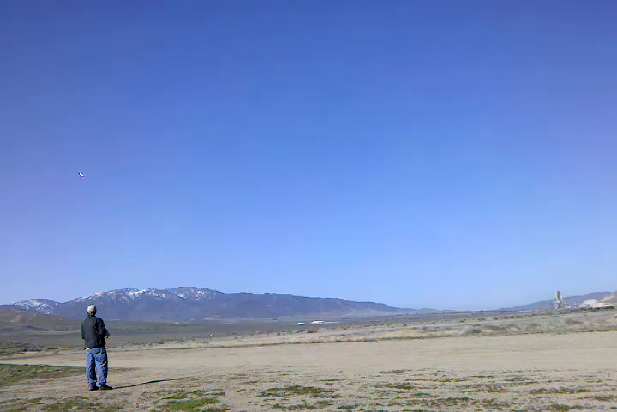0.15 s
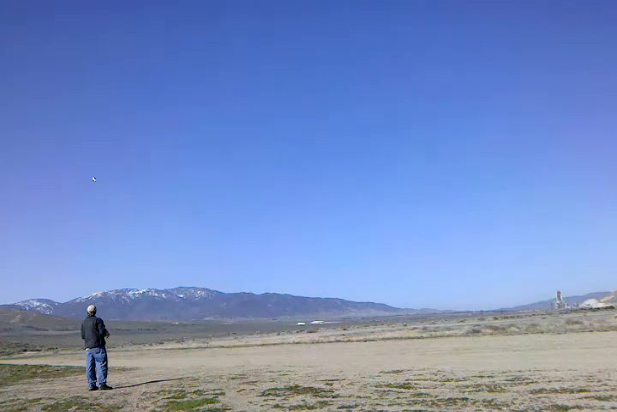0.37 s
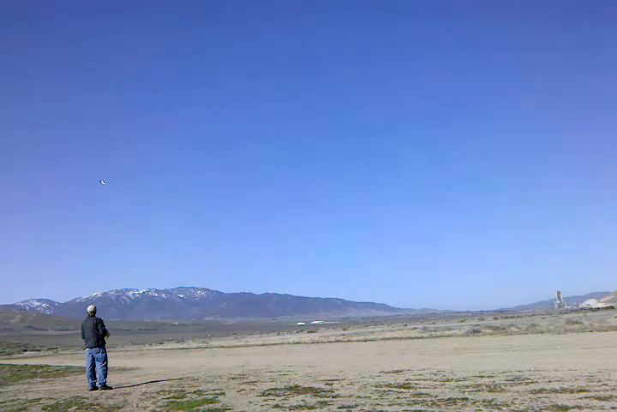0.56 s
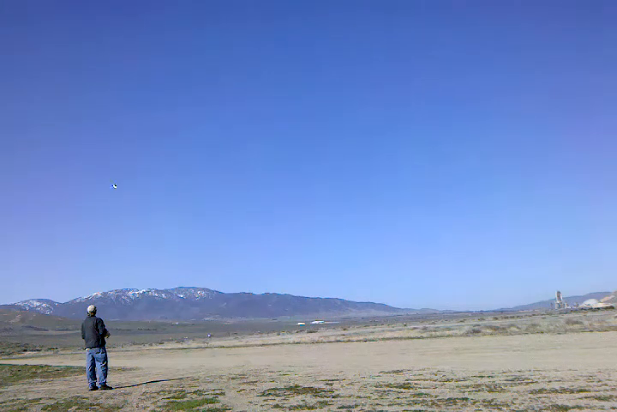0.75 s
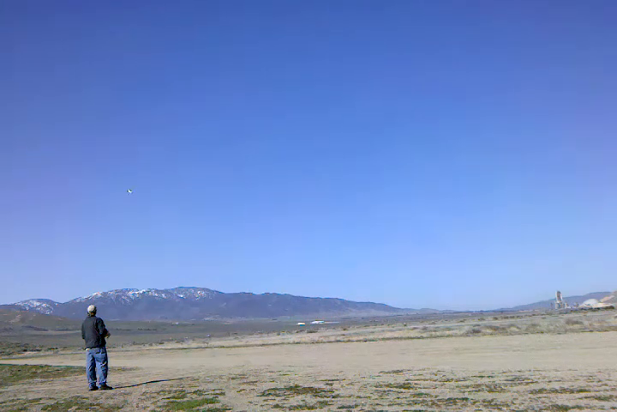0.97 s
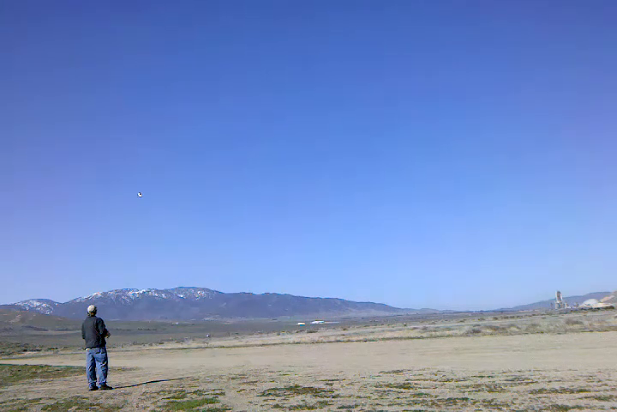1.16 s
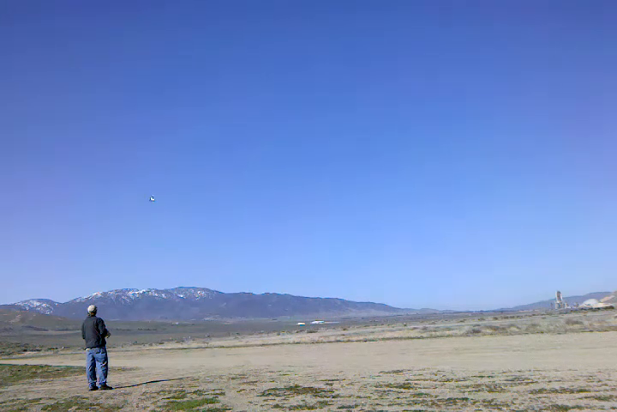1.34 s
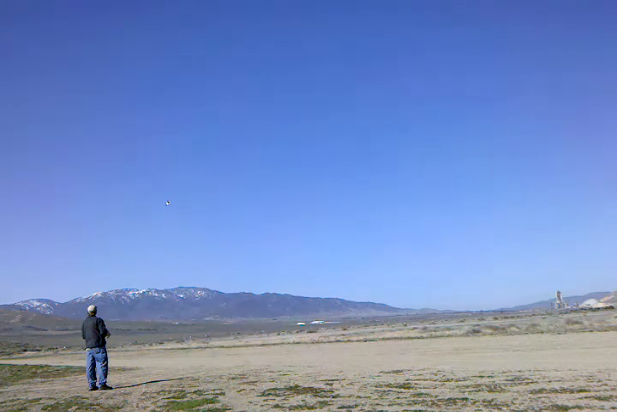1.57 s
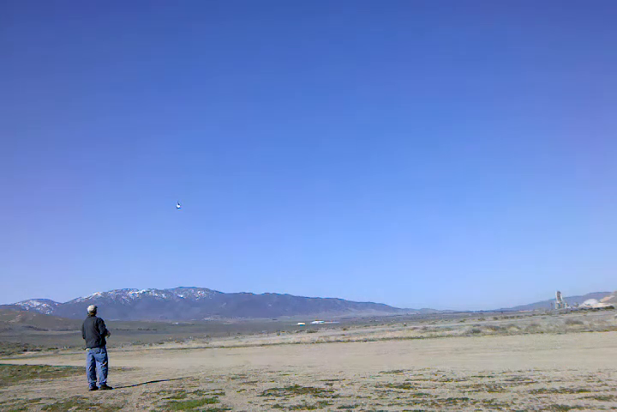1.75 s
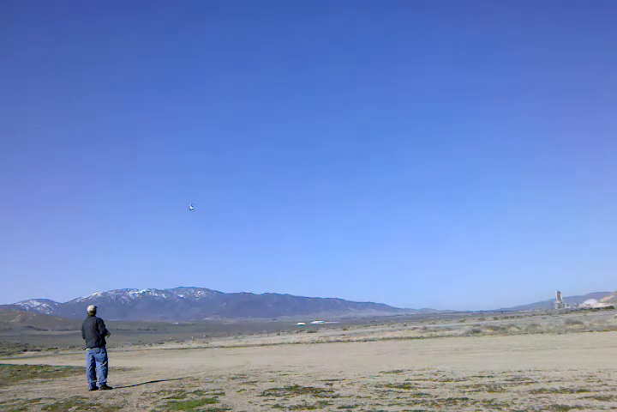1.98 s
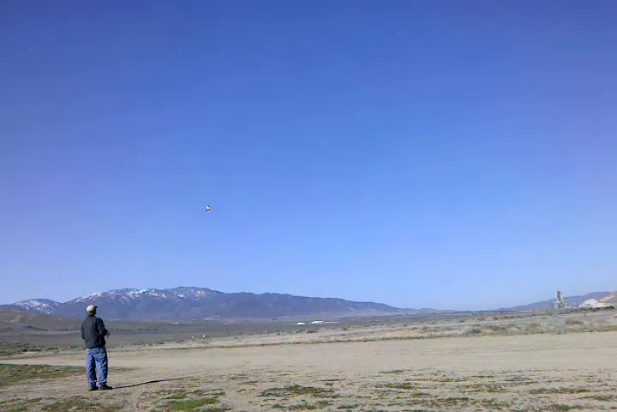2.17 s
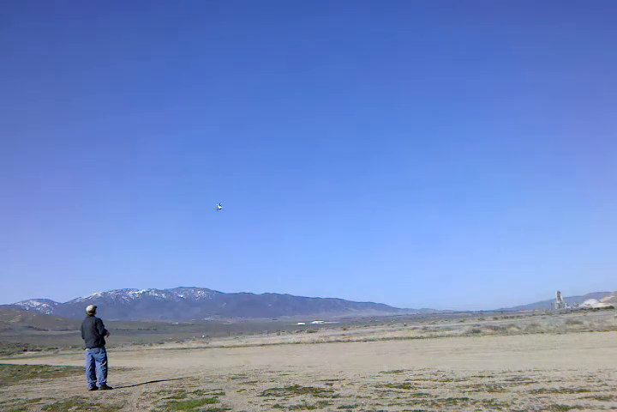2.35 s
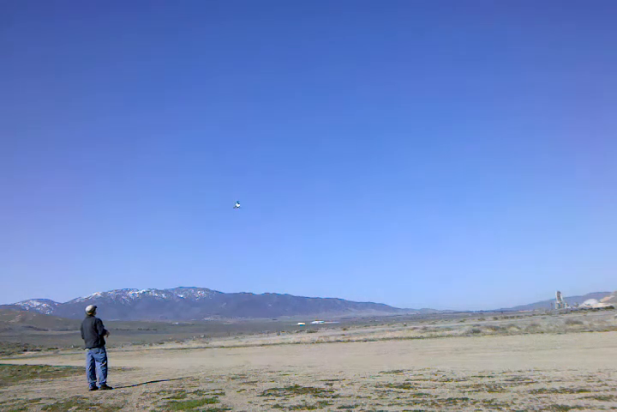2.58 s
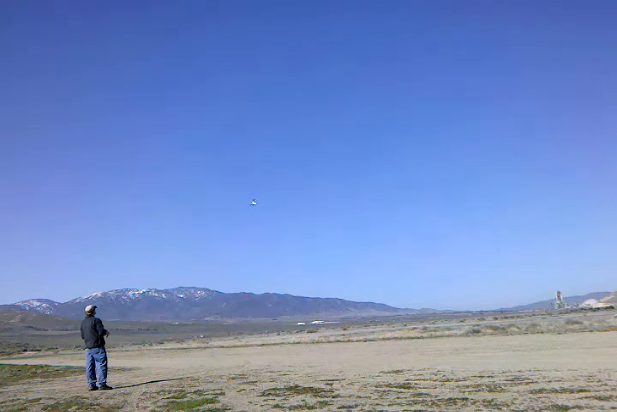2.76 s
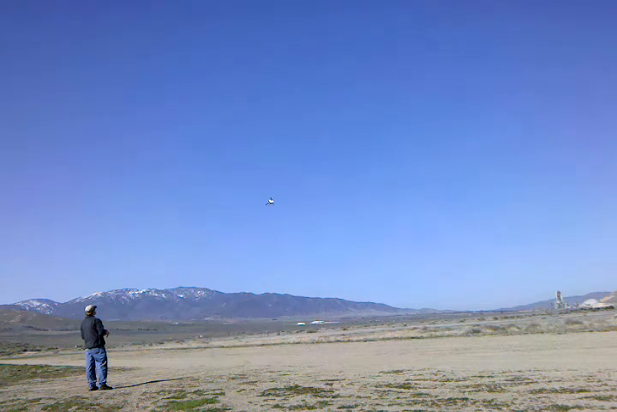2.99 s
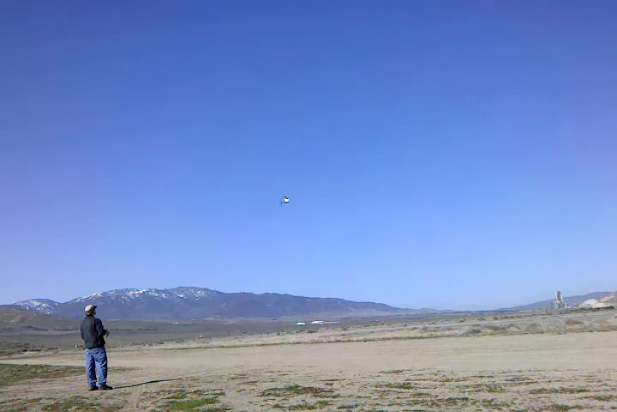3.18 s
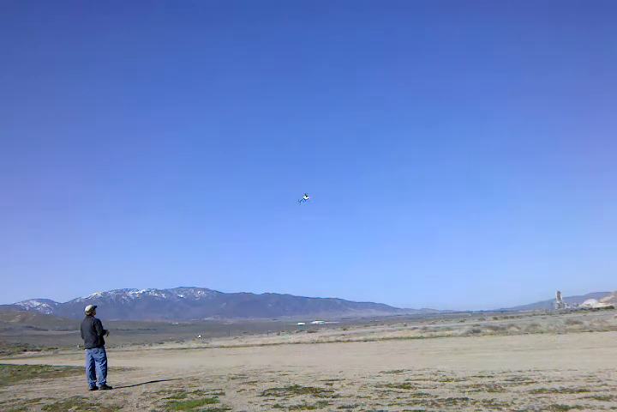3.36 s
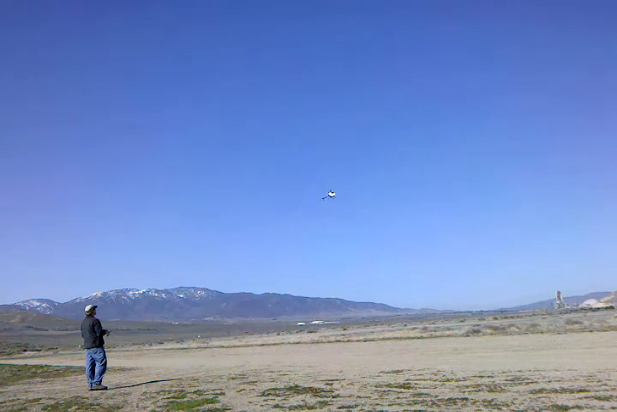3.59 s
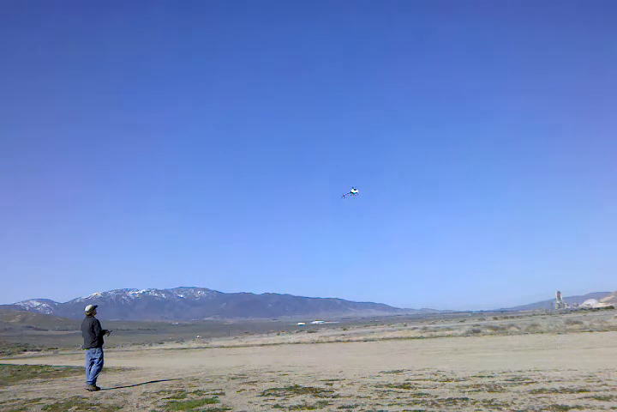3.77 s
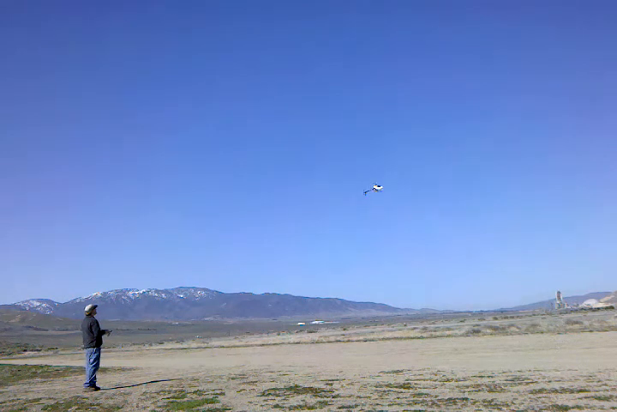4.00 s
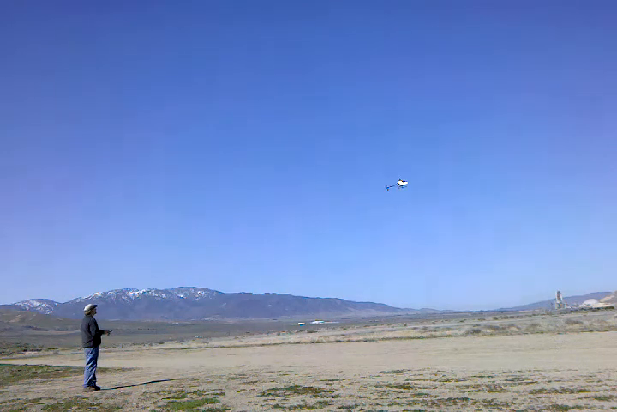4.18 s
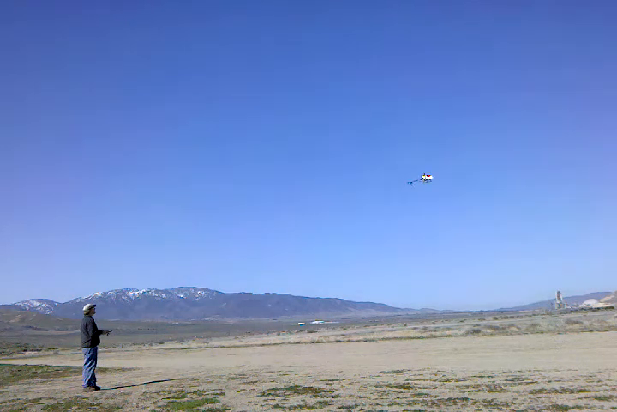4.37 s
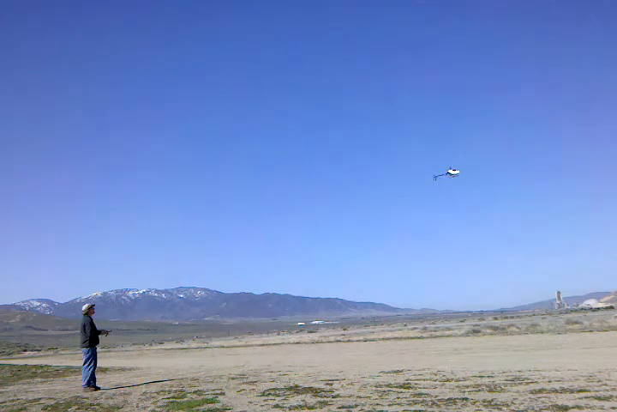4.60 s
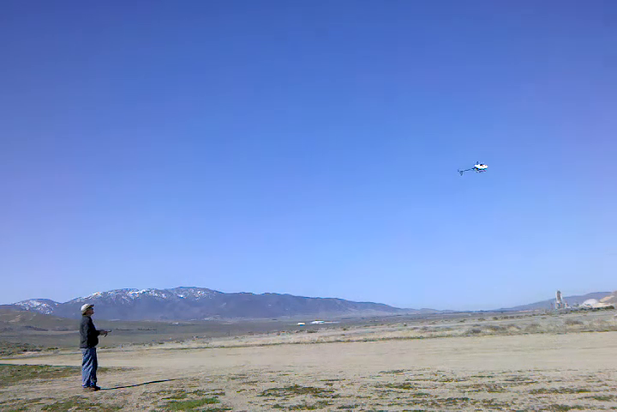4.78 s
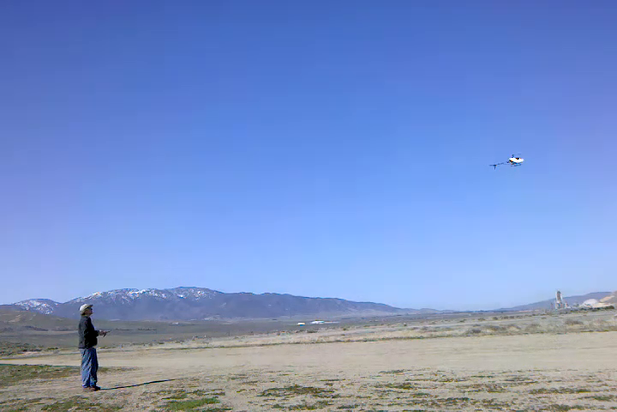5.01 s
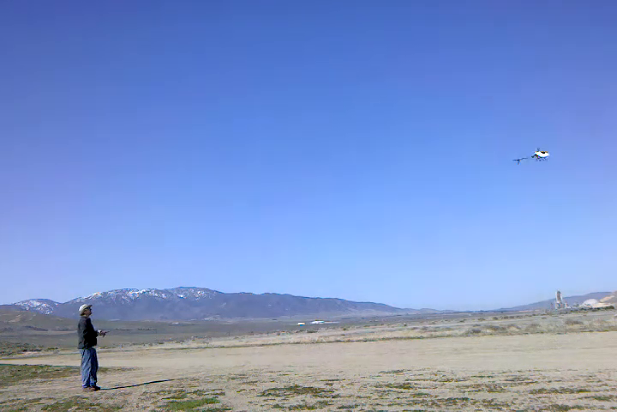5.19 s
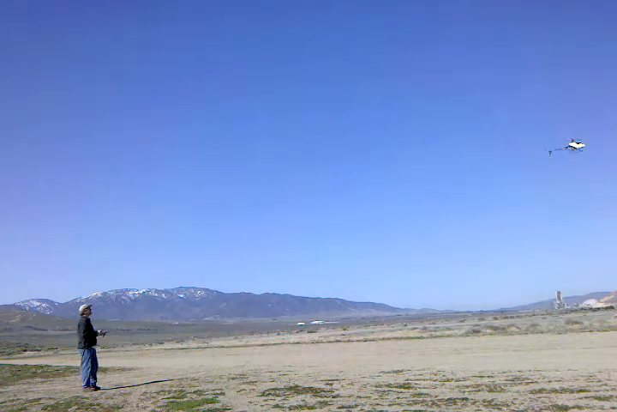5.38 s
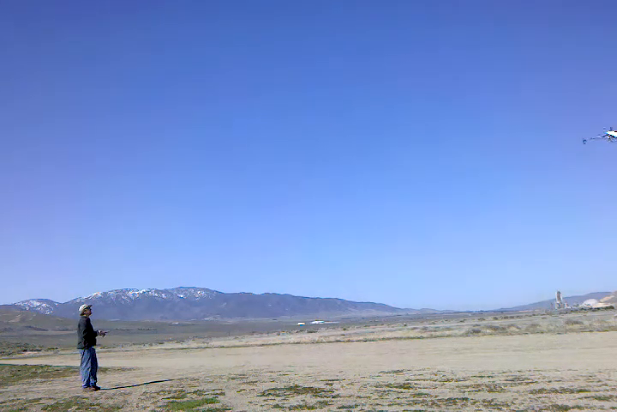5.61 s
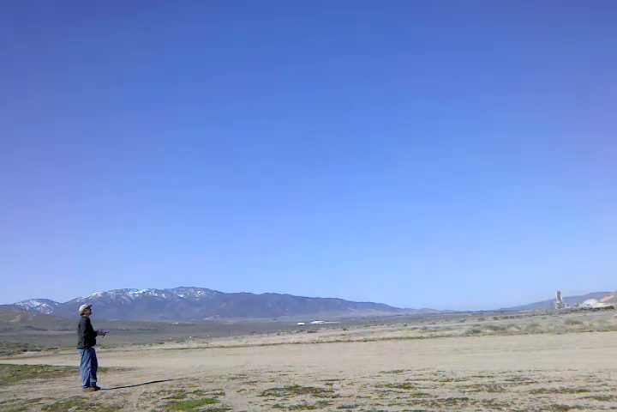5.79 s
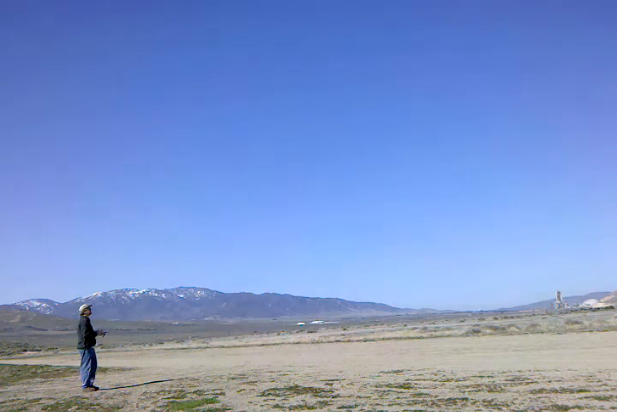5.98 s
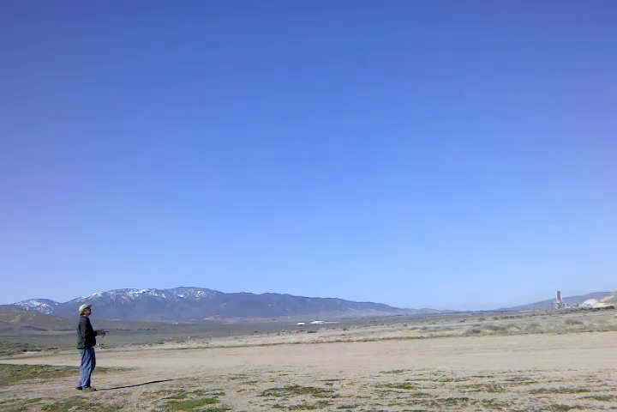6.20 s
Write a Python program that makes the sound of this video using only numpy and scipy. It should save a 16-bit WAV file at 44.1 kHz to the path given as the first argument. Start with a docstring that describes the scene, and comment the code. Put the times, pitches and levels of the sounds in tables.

```python
"""A distant swish and buzz over a dry field: a small electric model helicopter turns and comes close.
One rotor speed drives it all: two main blades that swish, thump and slap their own wake in the turn,
a buzzing tail rotor, a whining motor and a main gear whose mesh tone throbs once a revolution.
Swish and tones follow the distance and the side the helicopter shows; the slaps come in spells.
A narrow-band microphone trims the deep bass and the top."""
import sys
import numpy as np
from scipy import signal
from scipy.fft import rfft, irfft, next_fast_len
from scipy.io import wavfile
from scipy.ndimage import map_coordinates

SR = 44100
rng = np.random.default_rng(int(sys.argv[2]) if len(sys.argv) > 2 else 0)


def unload_wav(signal):
    """Save mono or channel-first audio to the path in sys.argv[1] as 16-bit WAV at rate SR, clipped to [-1, 1]."""
    wavfile.write(
        sys.argv[1],
        SR,
        np.round(np.clip(np.atleast_2d(signal).T, -1, 1) * 32767).astype(np.int16),
    )


N = 275625
TIME = np.arange(N) / SR

# main rotor speed as heard, Doppler shift included: (time [s], speed [turns/s])
ROTOR_SPEED = [(0.0, 27.2), (0.25, 27.35), (0.75, 28.04), (1.25, 28.84), (1.7, 29.3), (2.1, 29.38),
               (3.1, 29.09), (3.9, 28.88), (4.4, 28.47), (5.05, 28.24), (5.8, 27.84), (6.25, 27.53)]
# one long turn and a pass; aspect -180 is tail on, 0 nose on, 90 abeam:
# (time [s], distance [m], aspect [deg], ground echo lag [ms], lag across the rotor [ms])
FLIGHT_PATH = [(0, 43, -160, 1.6, 0.8), (.5, 44, -140, 1.574, 0.77), (1.2, 45.4, -110, 1.434, 0.707),
               (2, 42.4, -69, 1.392, .67), (2.6, 41.4, -46, 1.328, 0.37), (3.249, 33, -16.5, 1.373, 0.39),
               (3.601, 29.6, -5.5, 1.082, 0.39), (4.1, 23.7, 13, 1.084, 0.412),
               (4.6, 19.5, 34.5, 1.09, 0.471), (5.3, 15.5, 58.5, 1.094, 0.487),
               (5.7, 13.2, 72, 1.145, .527), (5.999, 11.1, 86.5, 1.175, .535),
               (6.25, 9.9, 100.5, 1.21, .54)]
# blend of the swish colours: (aspect [deg], view [0 far, 1 nose on, 2 abeam])
VIEWS = [(-75.5, 0.19), (-11, 0.87), (11.5, 1), (30, 1.46), (78, 2)]
# colour of the swish from each view, and of a blade crack: (frequency [Hz], relative level [dB])
AIR_FAR_EQ = [(60, -27), (110, -6.5), (360, -16), (650, 1.5), (900, -4.5), (1400, -10.5), (2150, -0.5),
              (2600, -6.5), (3200, -3.5), (3900, -14.5), (5000, -6.5), (5450, -11), (6000, -6), (7000, -14)]
AIR_FRONT_EQ = [(60, -29), (110, -11.5), (380, -16.5), (680, 5.5), (860, -3), (1150, -2.5), (1450, -14.5),
                (1750, -7), (2400, -1.5), (2900, -4), (4100, -6.5), (5300, -9.5), (6100, -13.5),
                (7000, -15)]
AIR_ABEAM_EQ = [(60, -31), (130, -16), (340, -11.5), (480, 1), (720, 5.5), (870, -7.5), (1200, 3),
                (1700, -0.5), (2050, 0.5), (2600, -2.5), (3200, -4.5), (4400, -4), (6000, -3),
                (7000, -13.5)]
CRACK_EQ = [(100, -25), (400, -20.5), (700, 4.5), (1150, 2), (1430, -4), (1700, 5.5), (2050, -7),
            (2550, -1.5), (2950, -16.5), (3400, -7), (4300, -18.5), (5500, -33), (7000, -20.5)]
# the knock of each main blade: (relative level [dB], pitch [Hz], time to fall 60 dB [s])
BLADE_KNOCKS = [(-1, 678, 0.037), (0, 726, .02)]
# where each blade meets the wake, tracking slightly unevenly: (position [turns])
SLAP_POSITIONS = [.94, .462]
# the blades run into their wake: (start [s], length [s], base knock level [dB], crack level [dB])
WAKE_SPELLS = [(0, 0.017, -55.5, -59), (.75, 0.18, -60.5, -63), (1.99, .17, -58.5, -61),
               (2.2, 0.094, -44.5, -51), (2.3, .45, -47.5, -50), (2.768, .11, -51, -50.5),
               (3.202, 0.2, -50.5, -49), (3.504, 0.28, -52, -47.5), (3.744, 0.39, -54.5, -50),
               (5.814, 0.13, -51.5, -64)]
# single harder wake strikes: (time [s], relative level [dB])
HARD_STRIKES = [(0.779, -63), (0.8317, -54), (0.8826, -62.5), (0.918, -56), (2.246, -51), (2.602, -47.5),
                (3.03, -50), (3.567, -52), (4, -42.5), (5.7, -58.5), (5.989, -46)]

# A beam is how a sound leaves the helicopter: (base level at REFERENCE_M [dB], lift ahead and
# cut behind [dB], lobes), with each lobe or notch as (aspect [deg], width [deg], gain [dB]).
SWISH_BEAM = (-45.5, 0.82, [(-16.5, 35, 4)])
HISS_BEAM = (-42, 0.57, [(41, 19, -2.5), (-58.5, 12, -0.5)])
THUMP_BEAMS = [(-64.5, 2.5, [(-12, 11, 3), (37.5, 27, -12.5), (79.5, 27, 7)]),
               (-68.5, 0, [(-16.5, 36, 12.3), (73, 11, 5.8)])]  # second and third harmonic of the main blades
TAIL_BLADE_BEAMS = [(-57, 2.1, [(-84.5, 55, 5), (58, 34, -5), (97, 16, -21.5)]),
                    (-55, 11.1, [(-34.5, 38.6, -28.5), (-2.5, 9, -4.5), (101.5, 14, -6.5)]),
                    (-57, 1.6, [(-55, 8.5, 5.7), (14, 9, 6), (100, 7.7, 7)]), (-65.5, 4, [(-135, 28, 16)]),
                    (-60, 0.76, [(-90.5, 44, -8.5), (29.5, 8.5, 3)])]  # one per harmonic, lowest first
TAIL_GEAR_BEAMS = [(-59.5, 4, [(65.7, 13, -10.5), (93.5, 18, 6)]), (-56, 0, [(-90, 55, 7.5),
                   (-29, 15, -12.5), (75, 25, -15)]), (-67, 3, [(-60.5, 50, -13.5)])]  # one per harmonic, lowest first
MOTOR_BEAMS = [(-53.5, 0, [(-160, 24, -11.5), (-0.5, 5.6, -16)]), (-66, 6, [(-120, 50, 9)]),
               (-49.5, 4.5, [(-150, 32, -7.5), (-88, 21, 3.5), (50, 45.6, -9.5)]),
               (-64.5, 0, [(-32.5, 31, -9.5), (57, 10, 9.5)]), (-70.5, 8, [(-90.5, 23, 8.2), (3.5, 12, 7)]),
               (-72, -1, [(-110, 15, 8), (63.5, 16, 17)])]  # one per entry of MOTOR_ORDERS
OVERTONE_BEAM = (-70, -1.3, [(-115, 40, 3)])
MAIN_GEAR_BEAM = (-57, 0, [(-118, 9.2, -8.5), (-29.5, 8.6, -7.5), (-14, 8, 3), (9.5, 8, -3.5),
                  (77.5, 56, 14)])

# weak tones of unequal blades, and faint drive train overtones: (pitch [multiples of rotor speed])
IMBALANCE_ORDERS = [11, 13, 15]
OVERTONE_ORDERS = [112.5, 117, 126, 153, 180, 194, 206]
# partials of the motor: (pitch [multiples of motor speed])
MOTOR_ORDERS = [1, 2, 4, 6, 8, 12]
HISS_COMB_DEPTHS = [.2, .7, .26]  # far, nose on, abeam

MOTOR_RATIO, PINION_TEETH = 17, 10  # ratios are shaft turns per main rotor turn
TAIL_RATIO, TAIL_TEETH = 4.5, 9
REFERENCE_M, HISS_ABSORB_DB_PER_M = 10, 0.34
SPELL_RISE_DB_PER_S, SPELL_FALL_DB_PER_S, CALM_SLAP_DB = 88, 49.5, -74.5
WAKE_SWISH = 0.49  # share of the base knock level that feeds the swish
THROB_DB, THROB_DIP_DB, THROB_DIP_AT_DEG, THROB_DIP_WIDTH_DEG = 7.5, 6.3, -6.5, 26
TOP_HZ = 9000


def amp(db):
    """Decibels to gain."""
    return 10 ** (np.asarray(db) / 20)


def unit(x):
    """Scale to rms 1."""
    return x / np.sqrt(np.mean(x ** 2) + 1e-20)


def curves(rows):
    """An automation curve for each column after the time."""
    times, *columns = np.transpose(rows)
    return [np.interp(TIME, times, column) for column in columns]


def wobble(rate):
    """A smooth random curve, rate knots a second."""
    coarse = TIME[::16]
    knots = rng.standard_normal(int(N * rate / SR) + 4)
    return np.interp(TIME, coarse, map_coordinates(knots, [coarse * rate]))


def filtered(x, response):
    """x through a gain that depends on frequency."""
    size = next_fast_len(N + SR // 4)
    return irfft(rfft(x, size) * response(np.fft.rfftfreq(size, 1 / SR)), size)[:N]


def coloured(x, eq):
    """x through an EQ curve of (frequency [Hz], level [dB]) points, at rms 1."""
    freqs, db = np.transpose(eq)
    return unit(filtered(x, lambda hz: amp(np.interp(np.log(hz + 1), np.log(freqs), db))))


def noise():
    """Fresh white noise."""
    return rng.standard_normal(N)


def tone(cycles, level_db, rough):
    """A partial whose strength and phase flutter in the turbulent air."""
    flutter = 1 + rough * (wobble(45) + 1j * wobble(45))
    return amp(level_db) * unit(np.real(flutter * np.exp(2j * np.pi * cycles)))


def swell(cycles, peak_at, depth_db):
    """A tremolo gain of rms 1 that peaks once a cycle."""
    return unit(amp(depth_db * np.cos(2 * np.pi * (cycles - peak_at))))


def delayed(x, lag_ms):
    """x through a sliding delay."""
    return np.interp(TIME - lag_ms / 1000, TIME, x)


def over_ground(x, strength):
    """Porous soil returns a grazing echo upside down, carving a sliding comb into the treble."""
    _, _, ground_ms, _ = curves(FLIGHT_PATH)
    echo = filtered(delayed(x, ground_ms), lambda hz: 1 - 1 / (1 + (hz / 950) ** 6))
    return x - strength * echo


def heard_db(beam, absorb_db_per_m=0):
    """Level at the listener: the beam's pattern, less spreading and any absorption in the air."""
    base_db, ahead_db, lobes = beam
    metres, aspect, _, _ = curves(FLIGHT_PATH)
    facing_db = ahead_db * np.cos(np.radians(aspect))
    lobes_db = sum(gain * np.exp(-((aspect - at) / width) ** 2) for at, width, gain in lobes)
    loss_db = 20 * np.log10(metres / REFERENCE_M) + absorb_db_per_m * (metres - REFERENCE_M)
    return base_db + facing_db + lobes_db - loss_db


def wake_levels():
    """Knock and crack envelopes in dB: each spell rises quickly, holds and dies away."""
    knock_db = crack_db = CALM_SLAP_DB
    for start, length, knock, crack in WAKE_SPELLS:
        attack_db = SPELL_RISE_DB_PER_S * np.maximum(start - TIME, 0)
        release_db = SPELL_FALL_DB_PER_S * np.maximum(TIME - start - length, 0)
        knock_db = np.maximum(knock_db, knock - attack_db - release_db)
        crack_db = np.maximum(crack_db, crack - attack_db - release_db)
    return knock_db, crack_db


def blade_swish(turns):
    """Turbulence on the blades pulses with each pass and changes colour as the helicopter turns."""
    _, aspect, _, across_ms = curves(FLIGHT_PATH)
    view = np.interp(aspect, *np.transpose(VIEWS))
    air = np.zeros(N)
    for k, eq in enumerate((AIR_FAR_EQ, AIR_FRONT_EQ, AIR_ABEAM_EQ)):
        share = np.clip(1 - abs(view - k), 0, 1)
        air += np.sqrt(share) * coloured(noise(), eq)
    air = over_ground(air, strength=.44 - 0.075 * view)
    low = filtered(air, lambda hz: 1 / (1 + (hz / 2000) ** 6))
    high = air - low
    # opposite pressures from spots on the rotor interfere: a broad comb sweeps down in the pass
    high = high - np.interp(view, [0, 1, 2], HISS_COMB_DEPTHS) * delayed(high, across_ms)
    knock_db, _ = wake_levels()
    swish_gain = np.hypot(amp(heard_db(SWISH_BEAM) + 2.5), WAKE_SWISH * amp(knock_db))
    hiss_gain = amp(heard_db(HISS_BEAM, HISS_ABSORB_DB_PER_M) + 4.0)
    swish = swish_gain * low * swell(2 * turns, peak_at=.2, depth_db=1.4)
    hiss = hiss_gain * high * swell(2 * turns, peak_at=0.25, depth_db=1.8)
    tail_chop = swell(2 * TAIL_RATIO * turns, peak_at=0.25, depth_db=1.5)
    return (swish + hiss) * tail_chop


def blade_slap(turns):
    """Each blade cuts the other's tip vortex: a hollow knock and a short crack, never twice alike."""
    knock_db, crack_db = wake_levels()
    t = np.arange(SR // 30) / SR

    def envelope(attack_s, t60_s):
        return (1 - np.exp(-t / attack_s)) * amp(-60 * t / t60_s)

    body = 0.076 * np.sin(2 * np.pi * 335 * t) * envelope(attack_s=0.0022, t60_s=0.064)
    knocks, hits = np.zeros((2, N))
    for position, (db, hz, t60_s) in zip(SLAP_POSITIONS, BLADE_KNOCKS):
        passes = np.arange(int(turns[-1])) + position
        jitter, knock_spread, crack_spread = rng.standard_normal((len(passes), 3)).T
        times = np.interp(passes, turns, TIME) + .00005 * jitter
        onsets = np.clip(times * SR, 0, N - 1).astype(int)
        hollow = np.sin(2 * np.pi * hz * t) * envelope(attack_s=0.00071, t60_s=t60_s)
        triggers = np.bincount(onsets, amp(db + knock_spread), N)
        knocks += signal.fftconvolve(triggers, hollow + body)[:N]
        hits += np.bincount(onsets, amp(0.64 * crack_spread), N)
    for time, db in HARD_STRIKES:
        onset = round(time * SR)
        hits[onset] += amp(db - crack_db[onset])
    # a sharp pressure step, then a few milliseconds of torn air
    torn_air = signal.fftconvolve(hits, envelope(attack_s=.0006, t60_s=.015))[:N] * noise()
    cracks = coloured(0.72 * unit(hits) + unit(torn_air), CRACK_EQ)
    return amp(knock_db - 3) * unit(knocks) + amp(crack_db) * over_ground(cracks, strength=.48)


def blade_thump(turns):
    """Low harmonics of the two blades pushing air; the microphone barely takes the lowest."""
    second_db, third_db = map(heard_db, THUMP_BEAMS)
    levels = [second_db - 16, second_db, third_db, third_db - 4.5]
    thump = sum(tone(2 * k * turns, db, rough=.13) for k, db in enumerate(levels, 1))
    imbalance = sum(tone(k * turns, third_db - 15.5, rough=0.44) for k in IMBALANCE_ORDERS)
    return thump + imbalance


def tail_rotor(turns):
    """Two small fast blades buzz; their gear sings above them."""
    shaft = TAIL_RATIO * turns
    buzz = sum(tone(2 * k * shaft, heard_db(beam), rough=.064)
               for k, beam in enumerate(TAIL_BLADE_BEAMS, 1))
    gear = sum(tone(k * TAIL_TEETH * shaft, heard_db(beam), rough=0.086)
               for k, beam in enumerate(TAIL_GEAR_BEAMS, 1))
    return buzz + gear


def motor(turns):
    """The shaft hums, the magnets whine on its even multiples, the drive train adds faint overtones."""
    whine = sum(tone(k * MOTOR_RATIO * turns, heard_db(beam), rough=0.059)
                for k, beam in zip(MOTOR_ORDERS, MOTOR_BEAMS))
    overtone_db = heard_db(OVERTONE_BEAM)
    return whine + sum(tone(k * turns, overtone_db, rough=0.24) for k in OVERTONE_ORDERS)


def main_gear(turns):
    """The gear runs slightly off centre, so its mesh tone swells and bends once a revolution."""
    _, aspect, _, _ = curves(FLIGHT_PATH)
    shaft = MOTOR_RATIO * turns
    bend = .07 * np.sin(2 * np.pi * (turns - .6))
    mesh = PINION_TEETH * shaft + bend
    # uneven teeth spread a faint band of rasp around the tone
    rasp = unit(np.real((wobble(450) + 1j * wobble(450)) * np.exp(2j * np.pi * mesh)))
    whine = tone(mesh, 0, rough=.07) + amp(-9) * rasp
    # the throb evens out as the nose comes round
    nose_on = np.exp(-((aspect - THROB_DIP_AT_DEG) / THROB_DIP_WIDTH_DEG) ** 2)
    throb = swell(turns, peak_at=0.8, depth_db=THROB_DB - THROB_DIP_DB * nose_on)
    shaft_ripple = swell(shaft, peak_at=0, depth_db=1.0)
    return amp(heard_db(MAIN_GEAR_BEAM)) * whine * throb * shaft_ripple


def field_air():
    """A faint, steady bed of air over open ground."""
    return amp(-71.5) * coloured(noise(), [(40, -9.5), (100, 0.5), (300, -3), (1000, -8), (7000, -24.5)])


def scene():
    """Every helicopter layer locks to the main rotor, over the bed of field air."""
    turns = np.cumsum(curves(ROTOR_SPEED)[0]) / SR
    rotors = blade_swish(turns) + blade_slap(turns) + blade_thump(turns) + tail_rotor(turns)
    return (rotors + motor(turns) + main_gear(turns) + field_air())[None]


def record(dry):
    """The microphone drops the deep bass and rolls off steeply in the treble."""
    def response(hz):
        low_cut = 1 / np.sqrt(1 + (62 / (hz + 1)) ** 8)
        high_cut = 1 / np.sqrt(1 + (hz / 6950) ** 56) + amp(-37.5)
        return low_cut * high_cut * (hz < TOP_HZ)
    return filtered(dry[0], response)[None]


dry = scene()
out = record(dry)
unload_wav(out)
```